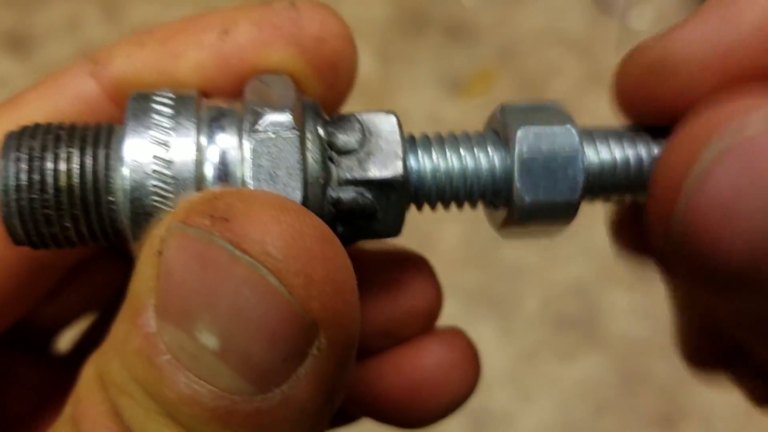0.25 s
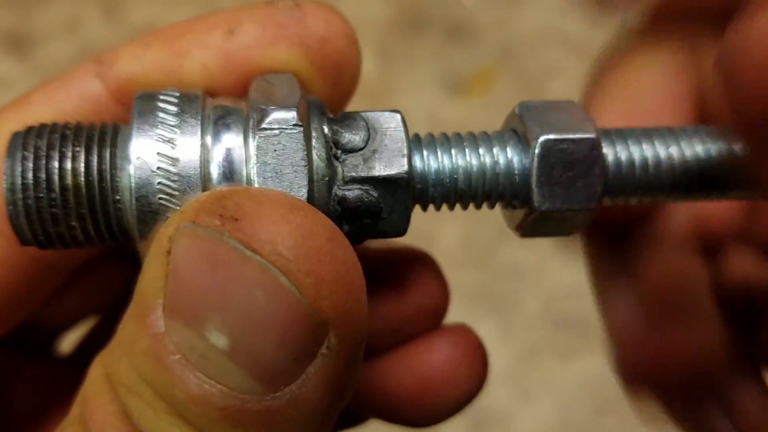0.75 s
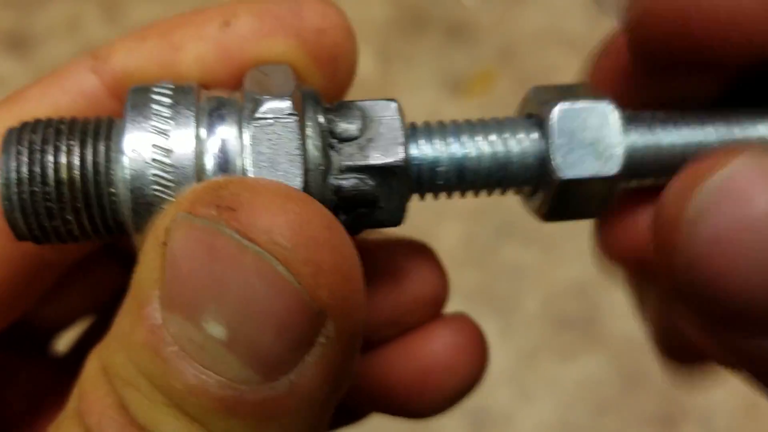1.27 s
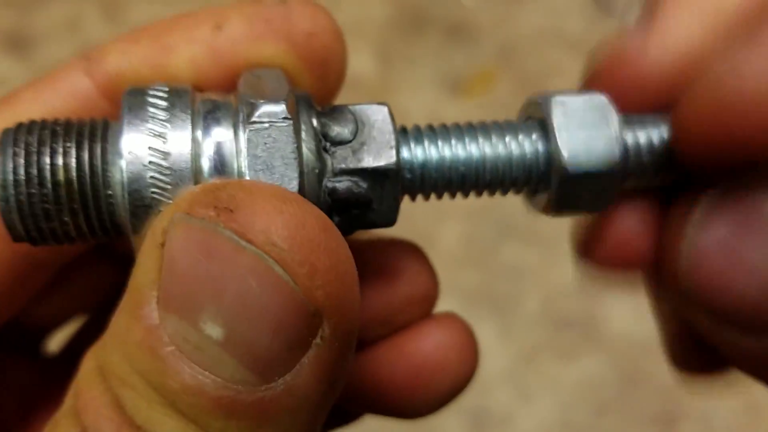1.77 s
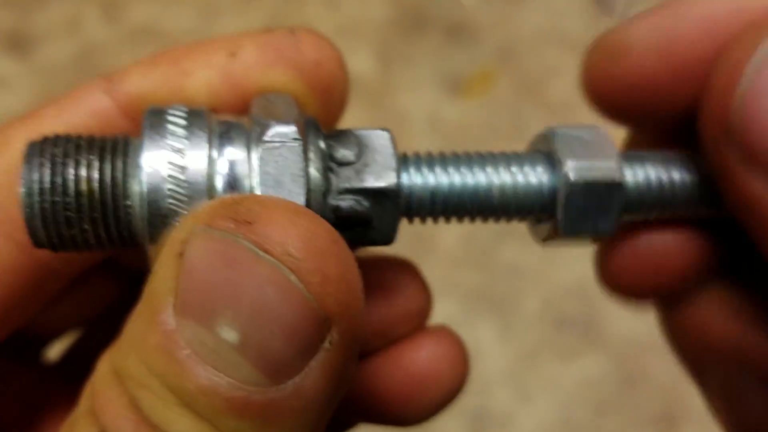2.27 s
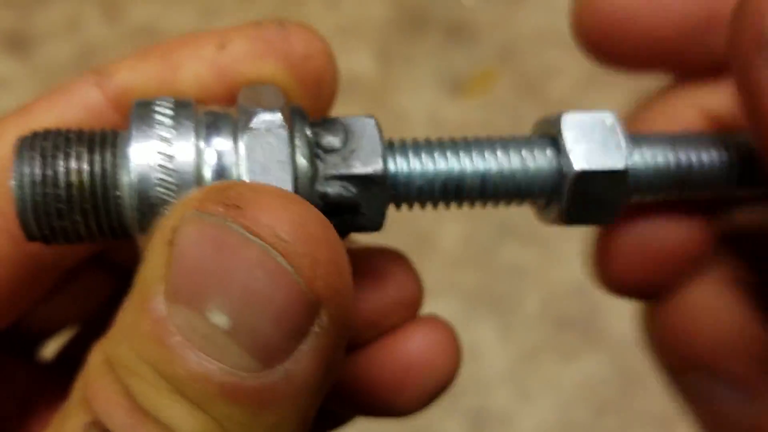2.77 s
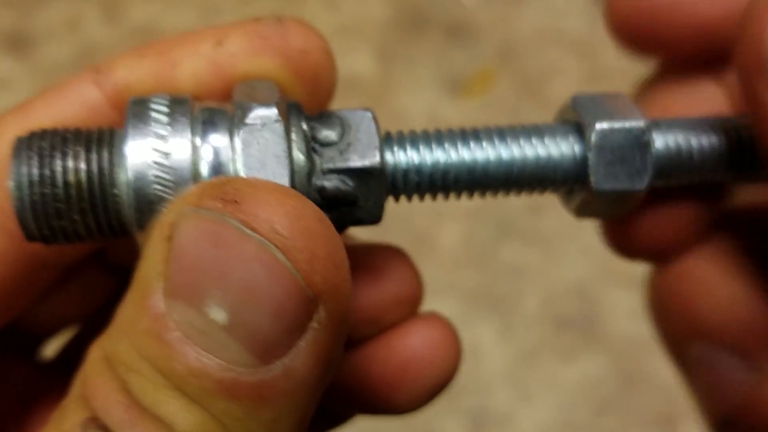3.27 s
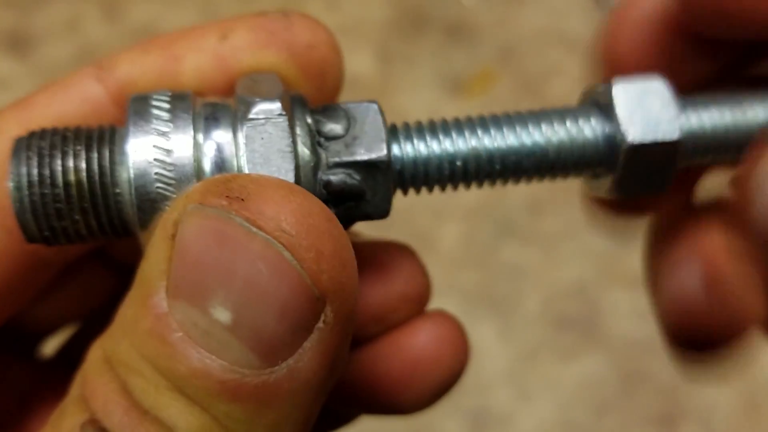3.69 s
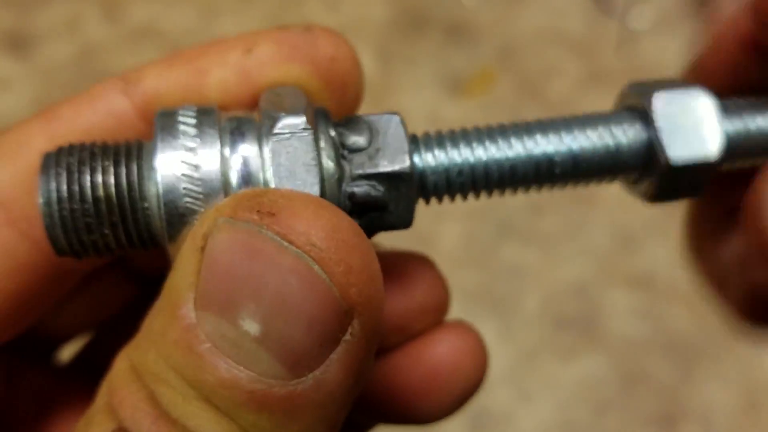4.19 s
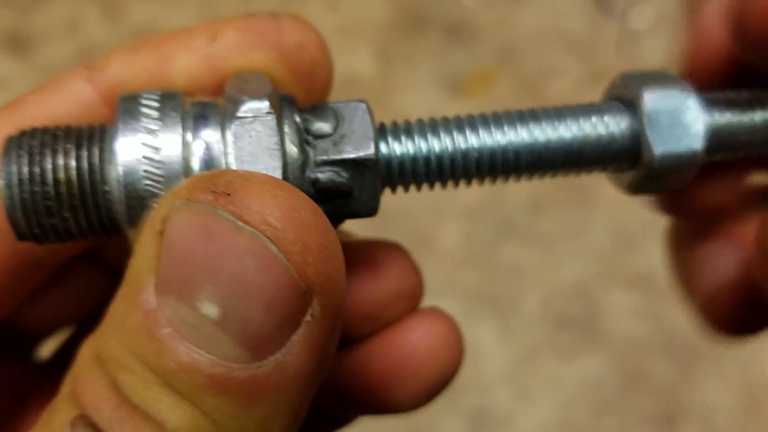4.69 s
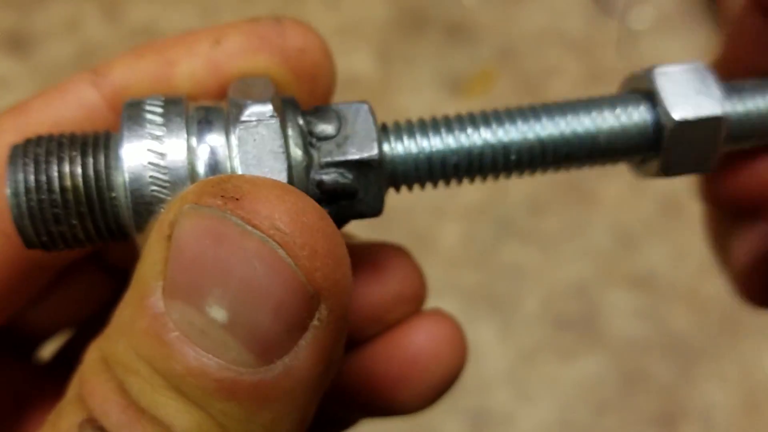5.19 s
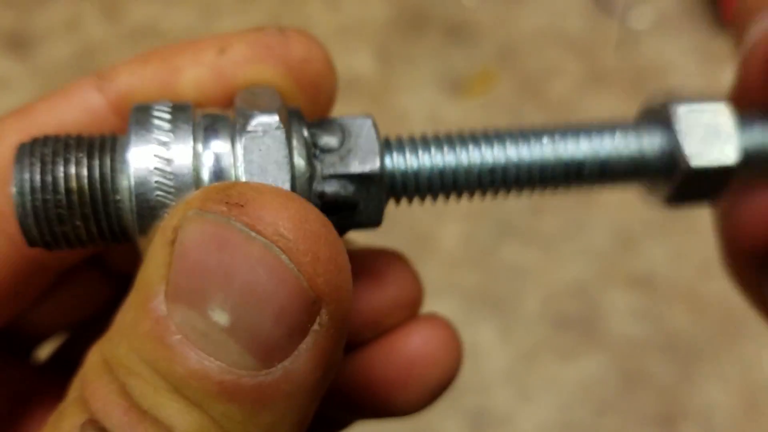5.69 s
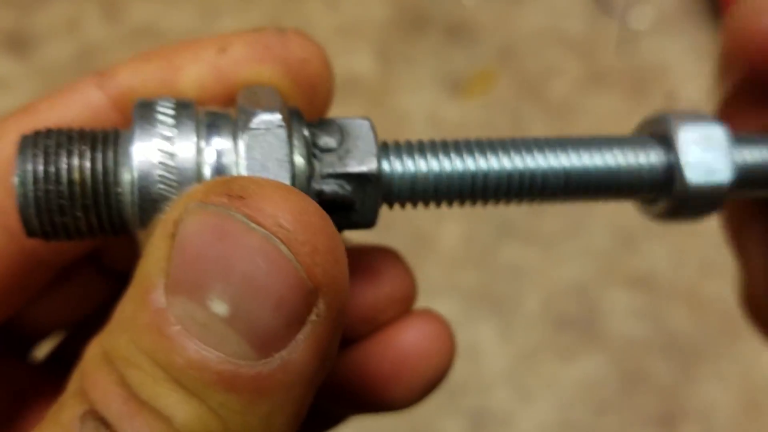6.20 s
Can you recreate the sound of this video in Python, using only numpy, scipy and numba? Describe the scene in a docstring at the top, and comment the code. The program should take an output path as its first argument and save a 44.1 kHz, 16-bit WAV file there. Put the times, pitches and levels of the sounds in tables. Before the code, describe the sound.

A small steel nut spins by hand along a threaded rod, heard close up in stereo. Each flick starts with a faint brush of skin, then loose threads catch and rattle: a few uneven clicks, a dull little knock and a brief bright ring. A light jingle of loose metal comes early. The flicks repeat steadily, about four per second, over soft room air and barely audible hum.

```python
"""In a quiet room with a faint hum, close to a phone, a finger flicks a steel nut along a threaded rod.
About four times a second the skin brushes the steel and the loose threads scrape and rattle:
random catches and bouncing blows ring the nut's two groups of modes, bend and knock the rod, and tick.
Early on a loose fitting on the rod jingles with modes of its own.
Two microphone ports hear the near steel with different colour and phase."""
import sys
import numpy as np
from scipy import signal
from scipy.fft import rfft, irfft
from scipy.io import wavfile
from numba import njit

SR = 44100
rng = np.random.default_rng(int(sys.argv[2]) if len(sys.argv) > 2 else 0)


def log_audio(samples):
    """Write samples as a 16-bit WAV file to the path given in sys.argv[1]."""
    # one column per channel
    frames = np.atleast_2d(samples).T
    # limit to full scale, then quantise
    limited = np.clip(frames, -1, 1)
    pcm = np.round(limited * 32767).astype(np.int16)
    wavfile.write(sys.argv[1], SR, pcm)


N = 284445

# Finger flicks, the threads scraping throughout; levels are relative, each part weighs them by its rule:
# start_s [s], end_s [s], strength_db [dB], brightness_db [dB], ring_db [dB]
FLICKS = [(-0.05, -0, -81, -14, -15), (0.28, 0.426, -84.5, 3, 3), (0.683, 0.755, -71.5, -7, 5.5),
          (1.007, 1.057, -70.5, -6, -11), (1.272, 1.345, -71.5, -13.5, -20), (1.583, 1.639, -60.5, -4, 7.5),
          (1.821, 1.903, -77.5, -10, 4), (2.117, 2.182, -71, -8.5, 5.5), (2.412, 2.51, -70.5, -8, 13),
          (2.669, 2.761, -76, -7, 11), (2.942, 3.013, -76, -17, 11), (3.215, 3.258, -71, -9, 13.5),
          (3.449, 3.554, -78.5, -14, 17.5), (3.696, 3.796, -79.5, -9, 11.5),
          (3.946, 4.016, -77, -13.5, 17.5), (4.19, 4.288, -76.5, -10.5, 7), (4.455, 4.587, -80.5, -10, 5.5),
          (4.738, 4.761, -75.5, -17.5, 19), (4.963, 5.061, -76, -4.5, 4), (5.222, 5.28, -78, -8, 6),
          (5.503, 5.584, -71.5, -7, 3.5), (5.752, 5.828, -78.5, -5.5, 4.5), (6.011, 6.09, -74.5, -6, -2),
          (6.301, 6.386, -73, -7.5, 9)]
# Thread flanks hitting, weighed by the same rules:
# time_s [s], strength_db [dB], brightness_db [dB], ring_db [dB]
RATTLE = [(0.335, -52.5, -13, 7), (0.359, -38.5, -10, 11), (0.366, -43, -6, 1), (0.673, -46.5, -9, 20.5),
          (0.7106, -30, -9.5, 8.5), (0.7356, -30.5, -1.5, 1), (0.7443, -37, 6, -24),
          (0.7631, -39.5, -2.5, -8), (0.925, -51.5, -1, -27), (0.951, -50, -2, 1), (1.01, -36.5, -4, 8.5),
          (1.021, -35, -15, 10), (1.0494, -36, 2, -22), (1.0781, -40, -3.5, 7.5), (1.0995, -52, -19, -9),
          (1.1975, -41.5, 0.5, 5), (1.2586, -46.5, -9, 11), (1.2954, -47, -1, 16), (1.3071, -38, -15, 10),
          (1.3368, -37, 5.5, 4), (1.366, -40.5, 3.5, 5.5), (1.3702, -47, -16.5, -2), (1.451, -54.5, -3, -7),
          (1.5593, -46, -19, 5), (1.581, -35.5, -8, 10), (1.5929, -46.5, 20, 20.5), (1.631, -36.5, 6, 16),
          (1.7672, -49.5, -13, 5.5), (1.8609, -47, -14, 3), (1.8689, -40, -12.5, 4),
          (2.1457, -52.5, -21, 8), (2.1641, -40.5, 4.5, 17), (2.2272, -47.5, -8, 10),
          (2.2406, -49.5, -14, 11.5), (2.3296, -58.5, -6, 12), (2.402, -47, -19, 14),
          (2.4327, -41.5, -18, 16), (2.459, -36.5, -13.5, 6), (2.4872, -37.5, 9, 16),
          (2.626, -45, -10.5, -4), (2.672, -45.5, -16, 13), (2.6926, -40.5, -14.5, 9.5),
          (2.714, -43, -5, -1), (2.735, -29.5, 5, 3), (2.7441, -32, 4.5, -17), (2.763, -63, 17, -1),
          (2.7845, -31.5, 0, 10), (2.8891, -53, -2, 14), (2.9338, -49.5, -20.5, 9.5),
          (2.9623, -44, -20.5, 13), (2.981, -31, 7, 6.5), (3.0046, -41, 2, 0), (3.051, -37.5, 0.5, 14.5),
          (3.0632, -46, -3, -4), (3.2176, -38.5, -6, 0), (3.2285, -37.5, 1, 10.5),
          (3.3034, -46.5, -12.5, 15), (3.417, -81, -7, 16), (3.4541, -42.5, -14.5, 8.5),
          (3.471, -43, -5, 14.5), (3.5026, -34, 5, -11), (3.5101, -40, -2, 17.5), (3.5226, -49, 5.5, 22),
          (3.546, -34, -6.5, 6.5), (3.6818, -47, -7, 1), (3.7068, -38, -12, 8.5), (3.7275, -38.5, 0, 1),
          (3.754, -36, -1.5, 11), (3.7743, -41, 1, 11), (3.796, -43, -3, 11.5), (3.9542, -41, -10, 6),
          (3.9746, -33, 1.5, 8), (3.9867, -38, 8.5, 1), (4.0324, -49.5, -13.5, 10),
          (4.1754, -49.5, -10, 15.5), (4.2067, -33, 3.5, 7), (4.27, -42.5, 5, 1), (4.3047, -53, 10, 4),
          (4.48, -45, -1.5, 10), (4.491, -42.5, -10.5, 12), (4.5044, -43.5, -4.5, 12.5),
          (4.5425, -37, 5, 2), (4.5572, -45, 6, -3), (4.592, -48, 2.5, 15.5), (4.7248, -36.5, -6, 7),
          (4.7373, -26.5, 1.5, 7.5), (4.7611, -38, 16, -2.5), (4.8071, -46.5, 2.5, 16.5),
          (4.8216, -48, 1, 11), (4.9893, -39.5, -7.5, 10.5), (5.022, -50.5, 13.5, 17),
          (5.0459, -31.5, 7.5, 6.5), (5.2309, -42, -7.5, 12), (5.3362, -51, -5, 5.5), (5.51, -46, -10.5, 9),
          (5.5281, -45, 10, 8), (5.5573, -33.5, 6.5, 6), (5.5908, -47, 20.5, 13), (5.7972, -44, 5, 5.5),
          (5.8611, -47, -13.5, 10), (5.8686, -44, 2.5, 3.5), (6.0311, -41, -1, 6), (6.0555, -46, -2, 15.5),
          (6.0782, -45.5, -3, -12), (6.1089, -44, 20, 4), (6.127, -44, 1.5, 7), (6.3125, -39.5, -8, 11.5),
          (6.3511, -47.5, 1, 18.5), (6.3631, -35, 5, -12), (6.4045, -42.5, 11, 0)]
# Relative spectrum of the treble click of steel on steel: frequency_hz [Hz], level_db [dB]
TICK = [(2500, -56), (4500, -8.5), (6000, 4.5), (7500, 1.5), (9400, -12), (11500, 3.5), (14000, -20),
        (16000, -19)]


def undb(db):
    """Amplitude ratio of a level in dB."""
    return 10 ** (np.asarray(db) / 20)


def along_hz(table):
    """Values of a (Hz, value) table at every FFT frequency, straight lines over log frequency."""
    hz, value = np.transpose(table)
    fft_hz = np.fft.rfftfreq(N, 1 / SR)
    return np.interp(np.log(fft_hz + 1), np.log(hz + 1), value)


def colour(x, table):
    """Shape x by a spectrum, keeping the power of white noise."""
    gain = undb(along_hz(table))
    return irfft(rfft(x) * gain / np.sqrt(np.mean(gain ** 2)), N)


def loss_rate(t60):
    """Decay per sample, in nepers, of a sound that falls 60 dB in t60 seconds."""
    return np.log(1000) / (t60 * SR)


def fade(x, t60):
    """Let everything in x die away exponentially, 60 dB in t60 seconds."""
    return signal.lfilter([1], [1, -np.exp(-loss_rate(t60))], x)


def blows(time_s, db):
    """One impulse at each time."""
    sample = np.clip((np.asarray(time_s) * SR).astype(int), 0, N - 1)
    return np.bincount(sample, undb(db), N)


def bounces(time_s):
    """Delay (s) and level (dB) of a first graze, the landing itself and two rebounds, one row per landing."""
    gap_s, touch_db, bounce_db, spread_db = 0.0024, -12.5, -8, 4  # mean gap, graze, step per rebound, scatter
    order = np.array([-1, 0, 1, 2])
    not_landing = order != 0  # the landing itself stays exact
    jitter = rng.random((len(time_s), order.size)) - 0.5
    scatter = rng.standard_normal((len(time_s), order.size))
    delay_s = gap_s * (order + jitter * not_landing)
    level_db = np.where(order < 0, touch_db, order * bounce_db)
    return delay_s, level_db + spread_db * scatter * not_landing


def chatter(time_s, db, bounce):
    """Blows with their graze and rebounds."""
    delay_s, level_db = bounce
    return blows((time_s[:, None] + delay_s).ravel(), (db[:, None] + level_db).ravel())


@njit
def carry(x, keep):
    """One-pole memory whose loss may change every sample."""
    y, z = np.empty_like(x), 0j
    for i in range(len(x)):
        z = z * keep[i] + x[i]
        y[i] = z
    return y


def ring(drive, modes, scatter_db, skid_s, turn_rad, tune=1.0, grip=1.0):
    """Damped modes; each push reaches a mode with its own strength and phase, a little apart at the two ports.

    The flank skids for skid_s (its 60 dB time) as it lands, so the ring builds up.
    tune scales the pitch; grip is an extra share kept each sample.
    """
    opposite = np.array([[1], [-1]])
    out = 0
    for hz, db, t60 in modes:
        strength, phase, apart = rng.standard_normal((3, N))
        turn = np.exp(2j * np.pi * phase + 0.5j * turn_rad * apart * opposite)
        luck = undb(scatter_db * strength) * turn
        push = fade(drive * luck + 1e-18, skid_s) * loss_rate(skid_s)
        keep = np.exp(-loss_rate(t60)) * grip * np.ones(N)
        envelope = np.array([carry(port, keep) for port in push])
        cycles = np.cumsum(hz * tune * np.ones(N)) / SR
        out = out + undb(db) * (envelope * np.exp(2j * np.pi * cycles)).imag
    return out


def crack(hits, table, t60, tail_t60, tail_db, snap_db):
    """A snap, a noise burst that swells and dies, and a softer tail off the hands, unlike at the two ports."""
    landing = fade(hits, t60) * loss_rate(t60)
    burst = fade(landing, t60) * rng.standard_normal(N)
    snap = undb(snap_db) * hits
    tail = undb(tail_db) * fade(landing, tail_t60) * rng.standard_normal((2, N))
    return colour(burst + snap + tail, table)


def swell(db, rise_db_s, fall_db_s):
    """Level db during each flick, climbing to it before and sinking after, in dB per second."""
    t = np.arange(N) / SR
    out = 0
    for (start, end, *_), top_db in zip(FLICKS, db):
        early_s = np.clip(start - t, 0, 1)
        late_s = np.clip(t - end, 0, 1)
        out = out + undb(top_db - rise_db_s * early_s - fall_db_s * late_s)
    return out


def room():
    """Steady air noise, more alike at the two ports in the bass than above, and a faint hum of sines."""
    # relative spectrum of the air: frequency_hz [Hz], density_db [dB per Hz]
    air_spectrum = [(20, -2), (45, -5), (75, 8.5), (130, 8), (170, -0.5), (300, -5.5), (500, -12.5),
                    (800, -13), (2000, -9), (4000, -14.5), (9000, -17), (16000, -34)]
    # steady hum tones: frequency_hz [Hz], level_db [dB]
    hum_tones = [(120, -83.5), (135, -80), (240, -88), (420, -89.5), (480, -87)]
    mid, side = rfft(rng.standard_normal((2, N)))
    side_share = along_hz([(100, 0.32), (1000, 0.91)])
    ports = irfft(mid + side_share * side * np.array([[1], [-1]]), N)
    air = undb(-71.5) * colour(ports, air_spectrum)
    t = np.arange(N) / SR
    hum = sum(undb(db) * np.sin(2 * np.pi * hz * t) for hz, db in hum_tones)
    return air + hum


def finger():
    """Skin brushes the steel as noise, swelling in before the nut turns, and shakes the rod faintly."""
    # relative spectrum of skin on steel: frequency_hz [Hz], level_db [dB]
    brush_spectrum = [(1500, -16.5), (4000, -6.5), (6000, -1.5), (8000, -9.5), (11000, -9), (16000, -7)]
    shake_spectrum = [(25, -36.0), (70, -2.0), (200, -14.5), (600, -20), (1200, -52)]  # (Hz, dB)
    strength_db = np.transpose(FLICKS)[2]
    # the brush follows flick strength by 0.6 dB per dB
    stroke = swell(-11 + 0.6 * strength_db, rise_db_s=169, fall_db_s=292)
    shake = colour(stroke * rng.standard_normal((2, N)), shake_spectrum)
    brush = colour(stroke * rng.standard_normal((2, N)), brush_spectrum)
    return brush, undb(-18.0) * shake


def fitting():
    """A loose fitting on the rod rings with its own modes and clicks as it bounces."""
    # jingling blows: time_s [s], bright_db [dB, bright modes], body_db [dB, body modes]
    jingles = [(0.1383, -84, -47), (0.3774, -48, -57), (0.385, -45, -66), (0.3885, -40.5, -63),
               (0.4013, -40.5, -57), (0.415, -46, -66), (0.4222, -46, -56), (0.7444, -66, -52)]
    # bright modes: frequency_hz [Hz], level_db [dB], t60_s [s]
    bright_modes = [(4200, -9, 0.065), (4390, -2, 0.033), (6150, -6, 0.05), (8180, -2, 0.025),
                    (9080, -1.5, 0.02), (12200, -14, 0.028)]
    # body modes: frequency_hz [Hz], level_db [dB], t60_s [s]
    body_modes = [(1596, 2, 0.04), (1583, -16, 0.22)]
    time_s, bright_db, body_db = np.transpose(jingles)
    bounce = bounces(time_s)
    bright_hits = chatter(time_s, bright_db, bounce)
    bright = ring(bright_hits, bright_modes, scatter_db=5.5, skid_s=0.00067, turn_rad=0.63)
    body = ring(blows(time_s, body_db), body_modes, scatter_db=0.0, skid_s=0.0031, turn_rad=1.5)
    click_hits = chatter(time_s, bright_db + 6, bounce)
    clicks = crack(click_hits, TICK, t60=0.0048, tail_t60=0.04, tail_db=-24, snap_db=2)
    return bright + body + clicks


def grit(rate, spread_db, most_db):
    """Tiny catches of the thread: random times, rate per second, a few larger; rms 1."""
    caught = rng.random(N) < rate / SR
    x = caught * undb(np.minimum(spread_db * rng.exponential(size=N), most_db))
    return x / np.sqrt(np.mean(x ** 2))


def contact(time_s, kept, held_t60, detune):
    """Landing flanks choke the ring and reseat the nut, shifting its pitch; between flicks it rests damped."""
    t = np.arange(N) / SR
    resting = np.all([(t < start) | (t > end) for start, end, *_ in FLICKS], axis=0)
    landed = blows(time_s, 0 * time_s) > 0
    grip = np.where(landed, kept, 1) * np.exp(-loss_rate(held_t60)) ** resting
    seat = rng.standard_normal(len(time_s) + 1)[np.searchsorted(time_s, t)]
    return grip, 1 + detune * seat


def pushes(rule, catches, bounce):
    """Blows and scraping drive each part by one rule, weighing a contact's brightness and ring."""
    base_db, per_bright, per_ring = rule

    def drive_db(strength_db, bright_db, ring_db):
        return base_db + strength_db + per_bright * bright_db + per_ring * ring_db

    time_s, *hit = np.transpose(RATTLE)
    rattle = chatter(time_s, drive_db(*hit), bounce)
    scrape = catches * swell(drive_db(*np.transpose(FLICKS)[2:]), rise_db_s=501, fall_db_s=681)
    return rattle + scrape


def nut_ring(drive, modes, tune, grip, wobble):
    """One group of nut modes: all but the last are choked and retuned by contact, the last rings free."""
    held = ring(drive, modes[:-1], scatter_db=2.0, skid_s=0.0016, turn_rad=1.0, tune=tune, grip=grip)
    free_tune = 0.995 + 0.004 * wobble
    free = ring(drive, modes[-1:], scatter_db=4.0, skid_s=0.005, turn_rad=1.0, tune=free_tune)
    return held + free


def nut():
    """Scraping and rattling excite the same nut and rod: ringing modes, a bending rod, knocks and ticks."""
    # the nut's lower modes, before retuning: frequency_hz [Hz], level_db [dB], t60_s [s]
    low_modes = [(5480, -0.5, 0.054), (5606, -4, 0.021), (5714, -2.5, 0.03), (5630, -41, .25)]
    # the nut's upper modes, before retuning: frequency_hz [Hz], level_db [dB], t60_s [s]
    high_modes = [(10604, 1.5, 0.073), (10850, -6, 0.032), (10660, -27, 0.32)]
    # the rod's modes, before retuning: frequency_hz [Hz], level_db [dB], t60_s [s]
    rod_modes = [(2675, -4, 0.026), (3510, -9, 0.04), (4356, 1, 0.03), (7200, -8, 0.047)]
    # the rod's bending with the nut at its start: frequency_hz [Hz], level_db [dB], t60_s [s]
    bend_modes = [(2154, 3.5, 0.029), (2246, -12, 0.21)]
    # relative spectrum of the dull knock: frequency_hz [Hz], level_db [dB]
    knock_spectrum = [(300, -27), (700, -18.5), (1400, -8.5), (2100, 5), (3300, 1), (4500, 2.5), (5500, -6),
                      (8000, -63)]
    # what any contact sets going: (dB, dB per dB of brightness, dB per dB of ring)
    knock_rule, tick_rule = (-2.5, -0.68, -0.01), (9.3, 0.18, -0.2)
    low_rule, high_rule = (-3.5, 0.01, 0.96), (-4.5, 0.99, 0.51)

    travel = np.arange(N) / N  # 0-1: how far the nut has gone along the rod
    catches = grit(rate=260, spread_db=4.5, most_db=13)
    landing_s = np.transpose(RATTLE)[0]
    bounce = bounces(landing_s)
    grip, tune = contact(landing_s, kept=0.12, held_t60=0.058, detune=0.0073)
    # the loose nut rocks, so the free rings waver
    wobble = fade(rng.standard_normal(N), 0.01975) / 11

    knocks = pushes(knock_rule, catches, bounce)
    ticks = pushes(tick_rule, catches, bounce)
    low_ring = nut_ring(pushes(low_rule, catches, bounce), low_modes, tune, grip, wobble)
    high_ring = nut_ring(pushes(high_rule, catches, bounce), high_modes, tune, grip, wobble)
    # further out, the nut's weight lowers the bending pitch and its rings move to the right port
    bend_tune = 1 - 0.11 * travel
    bend = ring(undb(-11.5) * knocks, bend_modes, scatter_db=1.5, skid_s=0.0042, turn_rad=0.33, tune=bend_tune)
    half_each = np.array([[0.5], [-0.5]])
    low_ring = low_ring * undb((-1.0 - 6.6 * travel) * half_each)
    high_ring = high_ring * undb((-0.5 - 1.7 * travel) * half_each)
    rod = ring(undb(-7.5) * knocks, rod_modes, scatter_db=4.0, skid_s=0.0016, turn_rad=1.05, tune=tune ** 6)
    knock = crack(knocks, knock_spectrum, t60=0.0037, tail_t60=0.064, tail_db=-22.5, snap_db=3.5)
    tick = crack(ticks, TICK, t60=0.0029, tail_t60=0.04, tail_db=-20.5, snap_db=5.5)
    return low_ring + high_ring + bend + rod + undb(5) * knock + tick


def scene():
    """The near steel reaches the two ports with different colour and phase; shake and room are added as is."""
    # level between the ports: frequency_hz [Hz], left_minus_right_db [dB]
    port_level = [(200, -7.5), (700, 15.5), (1500, 10), (3200, 5.5), (4300, -2), (5600, -2.5), (7500, 5.5),
                  (8500, -4.5), (10600, 5), (15000, -0.5)]
    # phase between the ports: frequency_hz [Hz], left_leads_rad [radians]
    port_phase = [(1400, 1.03), (2400, 4.16), (4100, 5.13), (5700, 4.77), (7600, 4.68), (10600, 8.66),
                  (16000, 15.3)]
    brush, shake = finger()
    half = undb(along_hz(port_level) / 2) * np.exp(0.5j * along_hz(port_phase))
    steel = nut() + fitting() + brush
    near = irfft(rfft(steel) * np.array([half, 1 / half]), N)
    return near + shake + room()


def record(dry):
    """The phone cuts the top: a steep elliptic low-pass at 16 kHz."""
    return signal.sosfilt(signal.ellip(10, 0.2, 70, 16000, fs=SR, output="sos"), dry)


dry = scene()
out = record(dry)
log_audio(out)
```